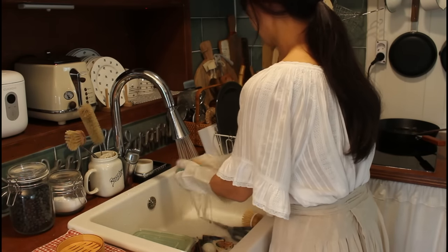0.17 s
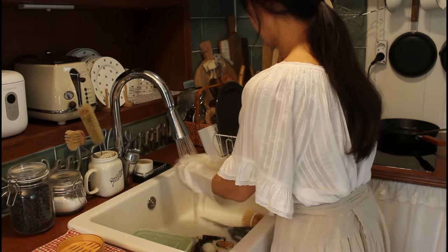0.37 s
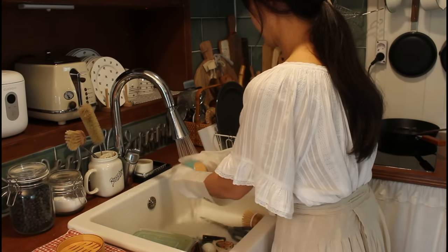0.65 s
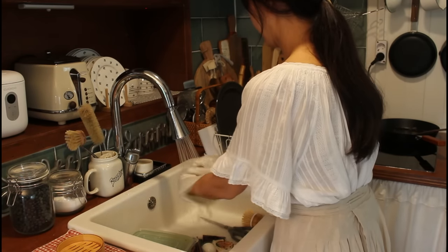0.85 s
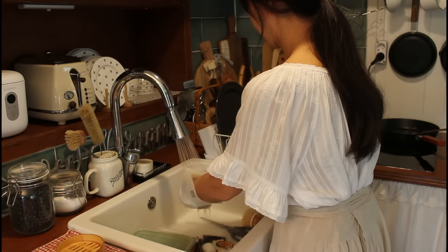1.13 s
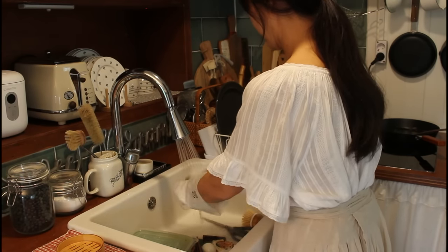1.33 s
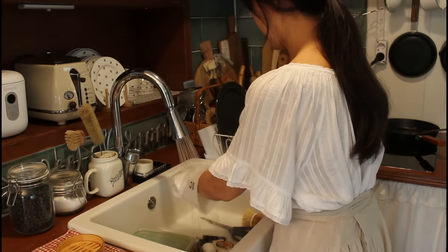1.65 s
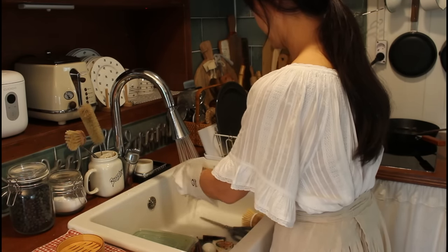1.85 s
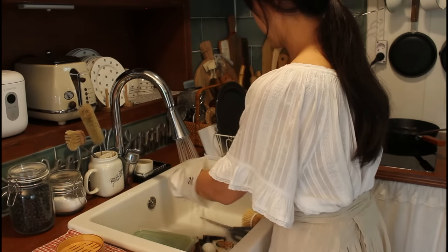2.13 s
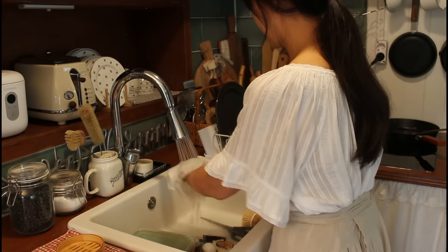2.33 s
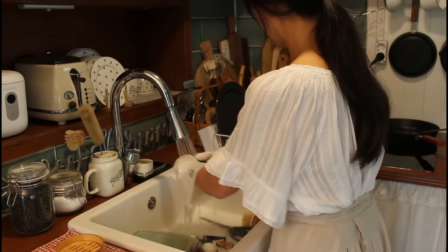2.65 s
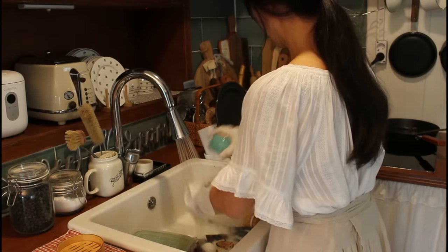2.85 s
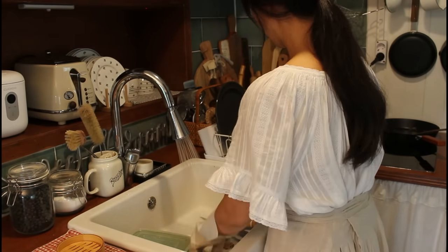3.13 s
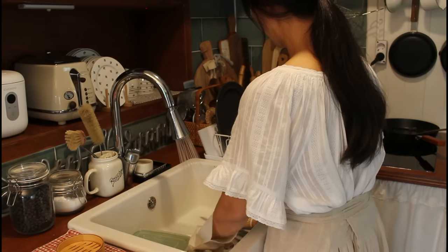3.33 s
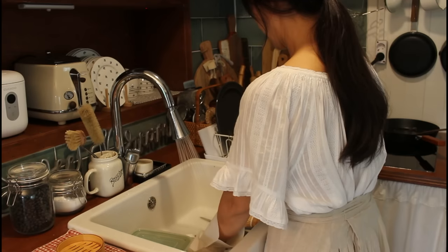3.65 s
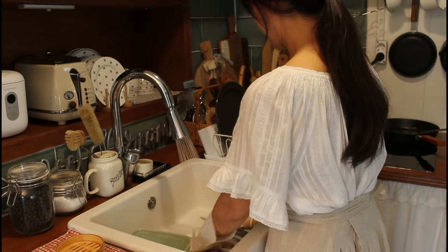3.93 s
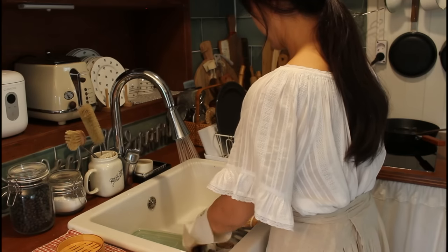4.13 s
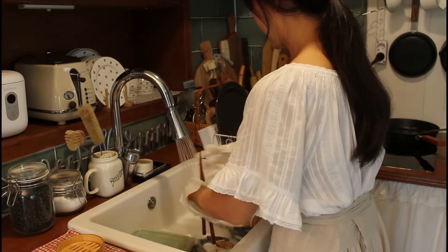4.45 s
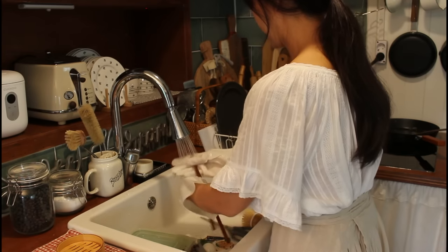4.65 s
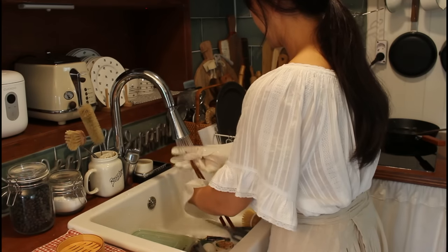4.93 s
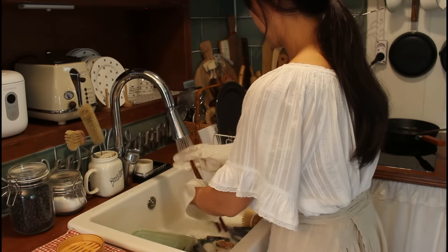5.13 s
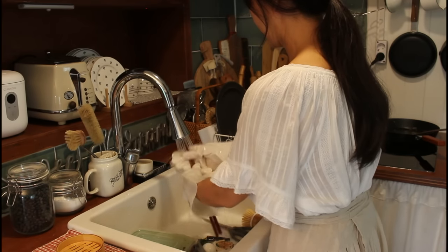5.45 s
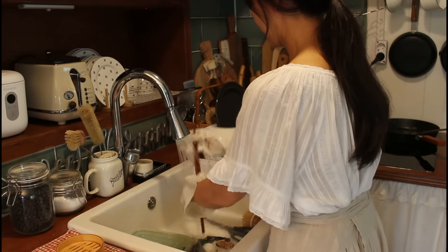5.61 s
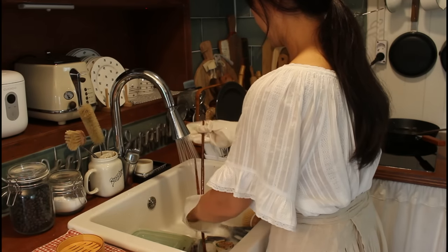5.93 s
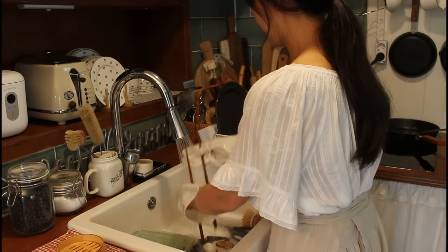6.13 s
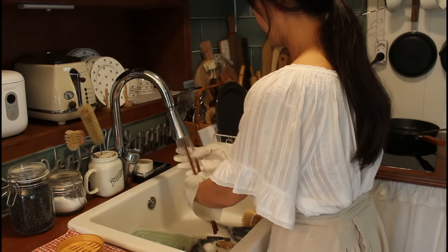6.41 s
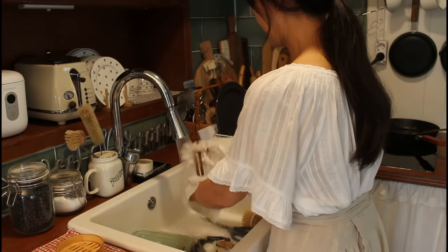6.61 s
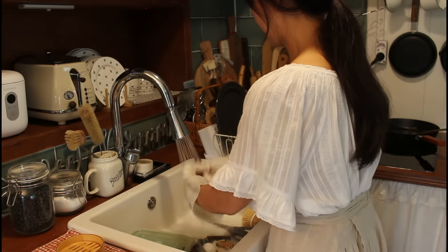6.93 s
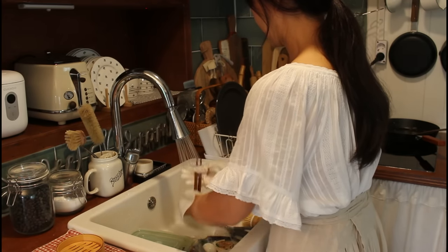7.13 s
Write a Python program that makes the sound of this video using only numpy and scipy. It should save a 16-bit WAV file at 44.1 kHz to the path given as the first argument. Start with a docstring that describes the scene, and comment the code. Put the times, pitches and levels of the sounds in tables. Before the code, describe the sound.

A thin, bright, close stereo pickup of rinsing dishes at a ceramic kitchen sink, without bass. From 0 to 3 s spray splashes busily off dishes: bubbly gurgles swell around 0.5 and 1.4 s, with fine hissing mist and wet slaps near 0.1, 0.4, 0.85, 1.2 and 2.1 s, then a strong cluster at 2.8-3.0 s. The gurgling drops away and softer spray continues. Plate knocks ring hard and short at about 3.55-3.75 s and again around 3.9 s, with slight rattle and faint room echo. At 4.35-4.5 s a bowl drags out in a quick, dull clatter. Water is thinner from 4.7 s, with small spatters near 5.2 s and a large splash at 5.8 s. Another burst comes around 6.1 s, tiny high chopstick clinks at 6.13 and 6.34 s, a gurgle near 6.55 s, and renewed slaps from 6.9 s until the end.

```python
"""In a small kitchen, a tap sprays into a ceramic sink while gloved hands rinse dishes and chopsticks.
Water gurgles in the basin, splashes off whatever is held in the jet and hisses as fine mist: random drops
filtered into pitch bands, each band wavering randomly in level; sudden slaps are decaying noise bands over
a steady tap hiss. A plate knocks against the crockery, a bowl is dragged out and chopsticks clink: struck
modes ring and rattle, with a faint room echo. The microphone carries no bass."""
import sys
import numpy as np
from scipy import signal
from scipy.io import wavfile

SR = 44100
rng = np.random.default_rng(int(sys.argv[2]) if len(sys.argv) > 2 else 0)


def to_wav(s):
    """Save 16-bit WAV."""
    ch = np.atleast_2d(s).T  # columns
    pcm = np.round(np.clip(ch, -1, 1) * 32767)  # PCM
    wavfile.write(sys.argv[1], SR, pcm.astype(np.int16))


N = 320607  # samples in the scene
STEP = 32  # samples between control points
CONTROL_S = np.arange(N // STEP + 2) * STEP / SR

# Surges of water gurgling into the basin. Each row: peak time in seconds, nominal peak level in dB,
# bubble pitch in Hz, rise in seconds, fall in seconds; rise and fall span 10 dB.
GURGLE_SURGES = [(0.0, -46.5, 1575, .1, 0.23), (.17, -53, 1700, 0.09, .15), (.34, -50, 1650, 0.11, .1),
                 (.52, -37.5, 1512, 0.15, 0.13), (.93, -48.5, 1430, 0.11, 0.14),
                 (1.23, -45, 1360, 0.072, 0.089), (1.33, -47.5, 1295, 0.085, 0.17),
                 (1.42, -36, 1304, 0.048, 0.13), (1.77, -43.5, 1596, 0.2, 0.062),
                 (1.9, -50, 1560, 0.1, 0.22), (2.27, -48, 1373, 0.069, 0.066), (2.44, -48, 1590, .09, 0.24),
                 (2.61, -46, 1566, 0.088, 0.042), (2.78, -54, 1810, 0.032, 0.083),
                 (2.91, -53, 1820, 0.028, 0.08), (2.95, -60.5, 760, .15, 0.075),
                 (3.17, -65.5, 1870, 0.076, 0.16), (4.198, -55.5, 1570, .04, 0.029),
                 (4.33, -55.5, 1783, 0.041, .3), (4.64, -46.5, 1520, 0.037, 0.16),
                 (4.76, -49.5, 1370, 0.13, 0.072), (4.97, -55.5, 1403, 0.28, 0.13),
                 (5.21, -54, 1620, 0.12, 0.19), (5.4, -57.5, 1390, 0.044, 0.089),
                 (5.6, -47.5, 1410, .12, 0.095), (5.99, -67, 1570, 0.058, 0.064),
                 (6.34, -53.5, 1320, 0.023, 0.12), (6.55, -42.5, 1503, 0.095, 0.13),
                 (6.73, -51, 1415, 0.14, 0.032), (6.96, -55.5, 1870, 0.04, 0.07),
                 (7.03, -50.5, 1610, 0.025, 0.11), (7.27, -49.5, 1524, 0.055, .1)]


def gurgle():
    """Bubble resonance: surges excite a swarm of low-pitched drops whose pitch follows the loudest surge."""
    level_db, pitch_hz = swells(GURGLE_SURGES, shape=1.45)
    return droplets(level_db, pitch_hz, 0.26, np.geomspace(560, 2150, num=12), per_s=1600,
                    spread_db=0.2, skirt_db=-13.5, skirt_octaves=0.66, waver_db=2.5)


# Hands and dishes passing through the jet. Each row: peak time in seconds, nominal peak level in dB,
# droplet pitch in Hz, rise in seconds, fall in seconds; rise and fall span 10 dB.
JET_PASSES = [(0.0, -52.5, 3380, .1, .1), (.066, -33.5, 3990, 0.011, 0.086), (.36, -42, 4680, 0.028, 0.21),
              (.55, -45.5, 3480, 0.066, 0.076), (.24, -56.5, 2910, .05, .1),
              (.68, -51.5, 3300, 0.055, 0.074), (.86, -41.5, 3880, 0.025, 0.14),
              (1.01, -52, 4600, 0.059, 0.13), (1.12, -45, 2420, 0.028, 0.077),
              (1.24, -40, 2810, 0.057, 0.073), (1.4, -47.5, 4560, 0.058, 0.19),
              (1.59, -49.5, 4140, 0.044, 0.1), (1.69, -43.5, 2480, 0.029, 0.27),
              (1.81, -42, 3240, 0.073, 0.14), (2.05, -46.5, 3830, 0.075, 0.04),
              (2.12, -46, 4280, 0.076, .25), (2.44, -42, 2670, 0.088, 0.22), (2.6, -58, 2330, .2, .05),
              (2.73, -41.5, 4050, 0.016, .15), (2.98, -32.5, 3340, 0.067, 0.084),
              (3.14, -42.5, 2980, .1, 0.14), (3.28, -43.5, 3040, 0.13, .15),
              (3.53, -46.5, 2930, 0.21, 0.72), (4.19, -51, 3230, 0.34, 0.08),
              (4.64, -50.5, 2862, 0.6, 0.047), (5.02, -63.5, 4500, 0.044, .05),
              (5.13, -53.5, 4400, 0.0077, 0.051), (5.218, -43, 3800, .007, 0.0073),
              (5.284, -50, 3380, 0.043, 0.032), (5.442, -52.5, 3130, 0.066, 0.033),
              (5.634, -58.5, 4970, 0.077, 0.018), (5.99, -41.5, 3210, 0.098, .25),
              (6.132, -35, 4620, 0.0086, 0.053), (6.26, -45, 3520, .15, 0.14),
              (6.716, -56, 2870, .025, 0.022), (6.874, -60, 3570, 0.036, 0.064),
              (6.998, -39, 4100, 0.065, .07), (7.2, -53.5, 3200, 0.17, .3)]


def splash():
    """Droplet impact noise: each pass through the jet swells a mid-pitched swarm; also returns its level."""
    level_db, pitch_hz = swells(JET_PASSES, shape=1.23)
    sound = droplets(level_db, pitch_hz, 0.2, np.geomspace(1800, 6500, num=14), per_s=3500,
                     spread_db=1.5, skirt_db=-3, skirt_octaves=0.65, waver_db=2.5)
    return sound, level_db


MIST_HZ, MIST_PER_SPLASH_DB = 7200, -18  # centre; share thrown up by each pass

# Level of the fine mist apart from the splashes' share. Each row: time in seconds, nominal level in dB.
MIST_LEVEL = [(0.0, -52), (.1, -44.5), (.25, -56.5), (.33, -53), (.8, -53.5), (.92, -48.5), (1.05, -62),
              (1.09, -46), (1.48, -51), (1.6, -49), (1.93, -45), (2.09, -52.5), (2.23, -45), (2.37, -50),
              (2.5, -45), (2.68, -56), (3.01, -42.5), (3.16, -48.5), (4.33, -46), (4.66, -53),
              (4.77, -81.5), (5.1, -66), (5.125, -57.5), (5.22, -60.5), (5.294, -45.5), (5.56, -66),
              (5.62, -59), (5.77, -66.5), (5.84, -47.5), (6.32, -47), (6.54, -82), (6.68, -81), (6.69, -64),
              (6.83, -77.5), (6.845, -62), (6.936, -43.5), (7.09, -56.5), (7.134, -51), (7.27, -57)]


def mist(splash_db):
    """Power addition: the mist's own level and a share of the splash drive a broad, high-pitched swarm."""
    own_db = np.interp(CONTROL_S, *np.transpose(MIST_LEVEL))
    power = from_db(2 * own_db) + from_db(2 * (splash_db + MIST_PER_SPLASH_DB))
    level_db = 10 * np.log10(power)
    centre_hz = np.full(len(level_db), MIST_HZ)
    return droplets(level_db, centre_hz, 0.34, np.geomspace(4800, 15500, num=10), per_s=4000,
                    spread_db=1.0, skirt_db=0.5, skirt_octaves=3.3, waver_db=3.0)


SLAP_CREST_DB = 15  # allowance for the peak of a slap over its rms

# Sudden slaps of water. Each row: start in seconds, nominal peak level in dB, pitch in Hz,
# t60 in seconds, width in octaves.
WATER_SLAPS = [(0.0607, -24, 4340, 0.26, 0.42), (0.3623, -23, 4900, 0.12, 0.26),
               (0.548, -33, 3730, 0.26, 0.43), (0.7603, -34.5, 3220, 0.76, 0.57),
               (0.8493, -20, 3950, 0.27, 0.36), (1.1218, -31.5, 2150, 0.29, 0.57),
               (1.203, -25, 4100, 0.42, 0.48), (1.516, -31, 7340, 0.26, 0.31), (2.1, -20.5, 4620, 0.3, 0.6),
               (2.714, -36, 4140, 0.27, 0.29), (2.792, -24, 5670, 0.98, 0.37),
               (2.868, -22, 3120, 0.25, 0.65), (2.899, -20, 4180, 0.43, 0.45),
               (5.0488, -38.5, 7500, 0.16, 0.22), (5.1133, -37, 6100, 0.37, 0.41),
               (5.219, -29.5, 3600, 0.31, 0.27), (5.251, -44, 3680, 0.33, 0.4),
               (5.471, -35, 2920, 0.21, 0.3), (5.7826, -20, 3880, 0.4, 0.4), (5.8326, -22.5, 3540, 1, 0.69),
               (6.6897, -48, 2120, 0.28, 0.45), (6.8167, -44, 3570, 0.5, 0.2),
               (6.869, -32, 3540, 0.43, 0.13), (6.926, -22, 3820, 0.17, 0.34),
               (7.0698, -26, 3500, 0.37, 0.42), (7.1464, -25.5, 3410, 0.32, 0.16)]


def slaps():
    """Impulsive spatter: water caught by a moving hand or dish bursts into a narrow, decaying noise band."""
    out = np.zeros((2, N))
    for start_s, peak_db, hz, t60, octaves in WATER_SLAPS:
        add(out, *burst(start_s, peak_db - SLAP_CREST_DB, hz, octaves, t60))
    return out


# Plate knocks. Each row: start in seconds, relative level in dB, brightness in dB per octave,
# rattle t60 in seconds, clatter against the knock in dB, clatter pitch in Hz, clatter t60 in seconds.
PLATE_KNOCKS = [(3.554, -7, -1, 0.34, -17.5, 2580, 0.35), (3.626, -3.5, 2, 0.45, -23.5, 2430, 0.93),
                (3.699, -24.5, -1, 0.17, -9, 2570, 0.62), (3.752, -24.5, 5, 0.18, -1, 4550, 0.38),
                (3.878, -39.5, -8, 0.9, -21, 1200, 0.18), (3.911, -17.5, -6, 0.22, -12, 2400, 0.18),
                (3.919, -7.5, -1.5, 0.34, -20, 2380, 0.54), (3.939, -19.5, -3.5, 0.76, -21, 2460, 1),
                (3.957, -23.5, -8.5, 0.37, -20.5, 2460, 0.34), (4.189, -50, -0.5, 0.14, -6.5, 830, 0.23)]
# Plate modes. Each row: nominal frequency in Hz, relative level in dB, t60 in seconds before damping.
PLATE_MODES = [(630, -26, .08), (780, -27, .07), (974, -18, .12), (1008, -11, .18), (1076, -9, .15),
               (1150, -13, .07), (1268, -15, .09), (2006, -8, .1), (2070, -10, .07), (2179, -4, .12),
               (2288, -9, .07), (2338, -6, .1), (2455, -10, .07), (2592, -8, .08), (2816, -10, .1),
               (2978, -9, .08), (3120, -9, .08), (3300, -12, .06), (4790, -1, .1), (4848, 3, .14),
               (4899, -2, .07), (4969, -4, .06), (5860, -18, .06), (6168, -13, .1), (7550, -24, .06),
               (8640, -20, .08), (9087, -18, .08)]


def plate():
    """Modal synthesis: a plate knocks against the crockery and its modes ring."""
    return crockery(PLATE_KNOCKS, PLATE_MODES, ring_db=-11.5, swell_s=0.0024,
                    clatter_octaves=0.74, damping=1.55)


# Contacts of a bowl dragged over the pile. Each row: start in seconds, relative level in dB, brightness in
# dB per octave, rattle t60 in seconds, clatter against the contact in dB, clatter pitch in Hz,
# clatter t60 in seconds.
BOWL_CONTACTS = [(4.351, -14, 2.5, 0.48, -8, 3440, 0.17), (4.361, -15.5, 2.5, 0.59, -14.5, 4100, 0.5),
                 (4.404, -19.5, -3.5, 0.45, -12.5, 2620, 0.23), (4.424, -20, -7, 0.37, -11.5, 2530, 0.24),
                 (4.454, -21, -4, 0.17, -13.5, 2440, 0.17), (4.495, -30, -5, 0.13, -16, 2460, 0.23)]
# Bowl modes. Each row: nominal frequency in Hz, relative level in dB, t60 in seconds before damping.
BOWL_MODES = [(727, -19, .07), (1065, -14, .05), (1270, -8, .08), (1650, -8, .04), (2050, -3, .05),
              (2165, -1, .06), (2340, -3, .05), (3060, -2, .05), (3192, -3, .06), (3376, -2, .06),
              (4522, -5, .06), (5760, -7, .04), (6885, -7, .04), (8096, -12, .04)]


def bowl():
    """Repeated modal excitation: close contacts of the dragged bowl ring its modes, with wide clatter."""
    return crockery(BOWL_CONTACTS, BOWL_MODES, ring_db=-8.5, swell_s=0.0047,
                    clatter_octaves=1.82, damping=1.6)


# Chopstick clinks. Each row: start in seconds, relative level in dB, brightness in dB per octave,
# rattle t60 in seconds, clatter against the clink in dB, clatter pitch in Hz, clatter t60 in seconds.
STICK_CLINKS = [(6.127, -23, -.6, 0.21, -17.5, 6500, 0.45), (6.337, -14, -0.99, 0.18, -14, 6500, 0.19),
                (6.341, -12, -0.83, 0.32, -12, 6300, 0.26), (6.347, -19.5, -1.1, .2, -16, 6500, 0.22)]
# Chopstick modes. Each row: nominal frequency in Hz, relative level in dB, t60 in seconds before damping.
STICK_MODES = [(3844, -7, .12), (4910, -8, .1), (5076, -6, .1), (5642, -11, .08), (6008, -5, .06),
               (6168, -5, .11), (6433, -10, .09), (7273, -4, .09), (7394, -1, .11), (8495, -10, .07),
               (9017, -11, .07), (9324, -10, .07), (9851, -10, .06), (10280, -9, .06), (11800, -8, .015),
               (13500, -7, .01), (15000, -7, .01)]


def chopsticks():
    """Modal synthesis of small bodies: high modes and a very quick onset make the clinks."""
    return crockery(STICK_CLINKS, STICK_MODES, ring_db=-11.5, swell_s=0.00059,
                    clatter_octaves=1.28, damping=1.33)


RATTLE_DB = -44  # scale of the random touches after a knock, against the knock itself
GRIP_DETUNE = 0.0022  # each contact shifts the modes by about this share
# The snap of each contact.
CRACK_DB, CRACK_HZ, CRACK_OCTAVES, CRACK_T60_S = -28.5, 6450, 1.6, 0.042


def crockery(hits, modes, ring_db, swell_s, clatter_octaves, damping):
    """Modal superposition: a knock strikes every mode, rattling keeps them stirred, the pile clatters."""
    out, t = np.zeros((2, N)), np.arange(SR // 2) / SR
    swell = 1 - np.exp(-(t / swell_s) ** 2)  # wet, gloved contacts build up gradually
    for start_s, db, bright, rattle_t60, clatter_db, clatter_hz, clatter_t60 in hits:
        # Cubed noise gives sparse, uneven touches after the first click.
        rattle = from_db(RATTLE_DB - 60 * t / max(rattle_t60, .01))
        touches = rng.standard_normal(len(t)) ** 3 * rattle
        touches[0] = 1
        rings = 0
        for hz, mode_db, t60 in modes:
            strength, lean, shift = rng.standard_normal(3)
            sides_db = 2.46 * lean * np.array([[1], [-1]])
            gain = from_db(mode_db + bright * np.log2(hz / 3000) + 2.9 * strength + sides_db)
            drive = signal.lfilter(*signal.iirpeak(hz, 3.5, SR), touches)
            rings = rings + gain * ring(drive, hz * (1 + GRIP_DETUNE * shift), t60 / damping)
        add(out, round(start_s * SR), from_db(db + ring_db) * swell * rings)
        add(out, *burst(start_s, db + clatter_db, clatter_hz, clatter_octaves, clatter_t60))
        crack_db = db + CRACK_DB + 2 * bright  # louder for bright knocks
        add(out, *burst(start_s, crack_db, CRACK_HZ, CRACK_OCTAVES, CRACK_T60_S))
    return out


def ring(clicks, hz, t60):
    """Damped harmonic oscillator: a unit click sets a sine of height 1 ringing."""
    r, w = from_db(-60 / (t60 * SR)), 2 * np.pi * hz / SR
    return signal.lfilter([0, np.sin(w)], [1, -2 * r * np.cos(w), r * r], clicks + 1e-18)


def burst(start_s, db, hz, octaves, t60):
    """Exponential decay: a quickly rising noise band dies away; returns its first sample and sound."""
    t, half = np.arange(SR // 2) / SR, 2 ** (max(octaves, .05) / 2)
    noise = band(rng.standard_normal((2, len(t))), hz / half, hz * half, order=3)
    mid, side = (rms_one(row) for row in noise)
    onset = np.minimum(t / 0.0017, 1)
    fade = from_db(db - 60 * t / max(t60, .01)) * onset
    return round(start_s * SR), fade * stereo(mid, side, hz)


def droplets(level_db, centre, octaves, pitches, per_s, spread_db, skirt_db, skirt_octaves, waver_db):
    """Granular noise: random drops in pitch bands, loudest near the current pitch, each band wavering."""
    away = np.log2(pitches[:, None] / centre)
    core = np.exp(-.5 * (away / np.maximum(octaves, .05)) ** 2)
    skirt = from_db(skirt_db) * np.exp(-.5 * (away / skirt_octaves) ** 2)
    shares = core + skirt
    even = from_db(level_db) / np.sqrt(np.sum(shares ** 2, axis=0))
    half = np.sqrt(pitches[1] / pitches[0])
    swarms = [swarm(per_s, spread_db) for _ in range(2)]  # neighbouring bands are independent
    out = np.zeros((2, N))
    for k, hz in enumerate(pitches):
        low, high = hz / half, hz * half
        waver = from_db(waver_db * drift(9.4))
        whole_to_band = np.sqrt(SR / 2 / (high - low))  # makes up for the power outside the band
        gain = even * shares[k] * waver * whole_to_band
        mid, side = band(swarms[k % 2], low, high, order=3)
        out += per_sample(gain) * stereo(mid, side, hz)
    return out


def swarm(per_s, spread_db):
    """Shot noise: drops land at random samples, most small, a few large; mid and side rows, rms 1."""
    out, count = np.full((2, N), 1e-9), int(per_s * N / SR)
    sizes = from_db(spread_db * np.minimum(rng.exponential(1, (2, count)), 5))
    drops = sizes * rng.standard_normal((2, count))
    np.put_along_axis(out, rng.integers(0, N, (2, count)), drops, axis=1)
    return rms_one(out)


def swells(rows, shape):
    """Incoherent addition: swells add in power and weight the pitch; returns level in dB and pitch in Hz."""
    peak_s, db, hz, rise, fall = np.transpose(rows)[:, :, None]
    since = CONTROL_S - peak_s
    flank = np.abs(since) / np.maximum(np.where(since < 0, rise, fall), .003)
    # Flanks in dB: shape 1 is straight, 2 rounded.
    power = from_db(2 * np.maximum(db - 10 * flank ** shape, -120))
    total = power.sum(axis=0)
    return 10 * np.log10(total), np.sum(power * hz, axis=0) / total


# Likeness of the two channels. Each row: frequency in Hz, left-right correlation from 0 to 1.
CHANNEL_LIKENESS = [(640, 0.52), (1410, 0.94), (3100, 0.76), (6820, .45), (15000, 0.4)]


def stereo(mid, side, hz):
    """Interchannel correlation: left and right share the mid part as far as the likeness at hz says."""
    alike = np.clip(at_hz(CHANNEL_LIKENESS, hz), 0, 1)
    opposed = side * np.array([[1], [-1]])
    return (np.sqrt(1 + alike) * mid + np.sqrt(1 - alike) * opposed) / np.sqrt(2)


TAP_DB = -71  # rms of the whole hiss before the bass cut

# Spectrum of the steady tap hiss. Each row: frequency in Hz, relative density in dB per Hz.
TAP_SPECTRUM = [(500, -39), (800, -14.5), (1500, 1.5), (2200, -5.5), (3200, -7.5), (4500, -8.5),
                (7500, -11), (12000, -13.5), (16000, -16.5)]


def tap_hiss():
    """Turbulent flow noise: half-octave noise bands of the running tap, each drifting in level."""
    out, white = 0, rng.standard_normal((2, 2, N))
    for k, low in enumerate(450 * 2 ** np.arange(0, 5.1, .5)):
        mid, side = band(white[k % 2], low, low * np.sqrt(2))
        hz = low * 2 ** .25
        gain = from_db(at_hz(TAP_SPECTRUM, hz) + 2.8 * drift(5.0))
        out = out + per_sample(gain) * stereo(mid, side, hz)
    return from_db(TAP_DB) * rms_one(out)


KITCHEN_T60_S, WALL_CUT_HZ, ROOM_DB = 0.3, 8300, -24  # t60 before the walls' treble loss
FIRST_KNOCK_S = 3.5  # the dishes have nothing to echo before this


def kitchen(x):
    """Reverberation by recirculation: eight feedback delays a side, duller on every round."""
    out, dull = np.zeros((2, len(x))), np.exp(-2 * np.pi * WALL_CUT_HZ / SR)
    for k, lag in enumerate((rng.uniform(.009, .03, 16) * SR).astype(int)):
        loop, gain, state = x.copy(), from_db(-60 * lag / SR / KITCHEN_T60_S), [0.]
        for i in range(lag, len(x), lag):  # one block per round
            back, state = signal.lfilter([gain * (1 - dull)], [1, -dull], loop[i - lag:i], zi=state)
            loop[i:i + lag] += back[:len(x) - i]
        out[k % 2] += (loop - x) * (-1) ** (k // 2)
    return out


def drift(rate_hz):
    """Low-passed randomness: noise through a double one-pole filter on the control points, rms 1."""
    r = np.exp(-2 * STEP * np.pi * rate_hz / SR)
    noise = rng.standard_normal(len(CONTROL_S) + 2000)
    return rms_one(signal.lfilter([1], [1, -2 * r, r * r], noise)[2000:])  # start-up dropped


def band(x, low_hz, high_hz, order=2):
    """Band limitation: a Butterworth filter passes one range of pitch."""
    edges = [low_hz, min(high_hz, .45 * SR)]
    return signal.sosfilt(signal.butter(order, edges, "band", fs=SR, output="sos"), x)


def at_hz(points, hz):
    """Logarithmic pitch: interpolates a spectrum table along log frequency."""
    table_hz, values = np.transpose(points)
    return np.interp(np.log(hz), np.log(table_hz), values)


def per_sample(control):
    """Linear interpolation: control points become one value per sample."""
    return np.interp(np.arange(N) / STEP, np.arange(len(control)), control)


def from_db(db):
    """Decibel law: 20 dB is a factor of ten in amplitude."""
    return 10 ** (np.asarray(db) / 20)


def rms_one(x):
    """Root-mean-square normalisation: scales the whole array to rms 1."""
    return x / np.sqrt(np.mean(x ** 2) + 1e-20)


def add(out, at, sound):
    """Linear superposition: adds a sound from sample 'at' on, cut at the scene's end."""
    out[:, at:at + sound.shape[1]] += sound[:, :N - at]


LEFT_DB = 0.22  # left raised and right lowered by this


def scene():
    """Superposition: water, dishes with their room echo, and tap hiss add up."""
    splashes, splash_db = splash()
    water = gurgle() + splashes + mist(splash_db) + slaps()
    dishes = plate() + bowl() + chopsticks()
    first = round(FIRST_KNOCK_S * SR)
    dishes[:, first:] += from_db(ROOM_DB) * kitchen(dishes[:, first:].mean(axis=0))
    return (water + dishes + tap_hiss()) * from_db([[LEFT_DB], [-LEFT_DB]])


BASS_CUT_HZ, SELF_NOISE_DB, CUTOFF_HZ = 657, -103, 15900


def record(dry):
    """Transducer band limits: a steep bass cut, faint self-noise, then the top is cut."""
    thin = signal.sosfilt(signal.butter(8, BASS_CUT_HZ, "high", fs=SR, output="sos"), dry)
    thin = thin + from_db(SELF_NOISE_DB) * rng.standard_normal(dry.shape)
    return signal.sosfilt(signal.cheby2(14, 70, CUTOFF_HZ + 300, fs=SR, output="sos"), thin)


dry = scene()
out = record(dry)
to_wav(out)
```